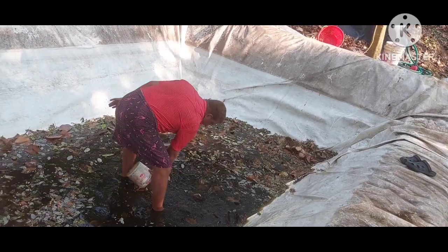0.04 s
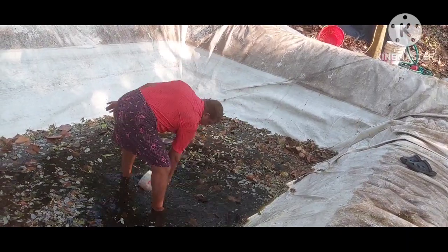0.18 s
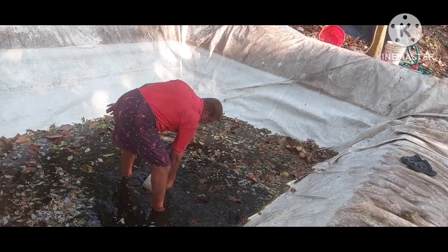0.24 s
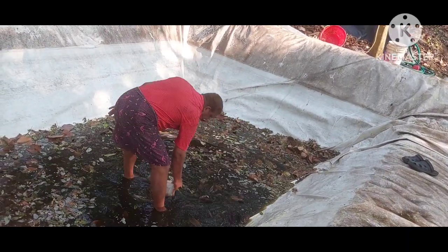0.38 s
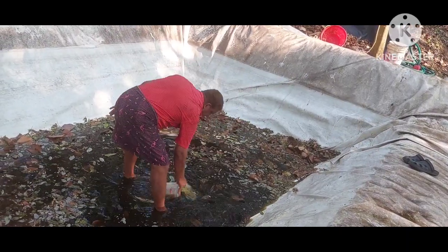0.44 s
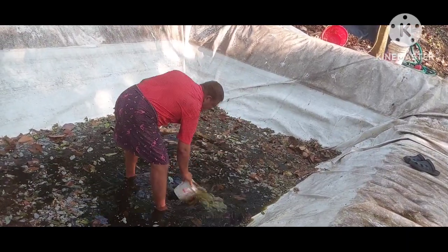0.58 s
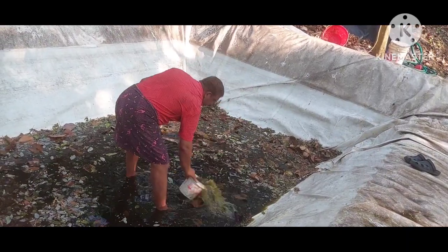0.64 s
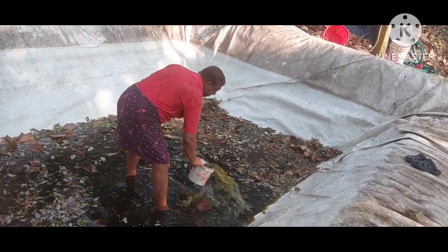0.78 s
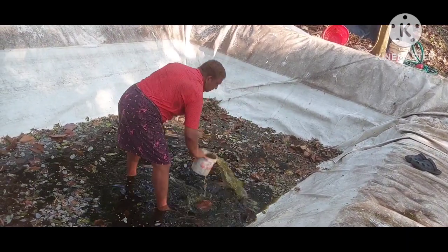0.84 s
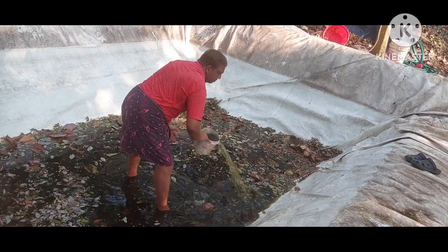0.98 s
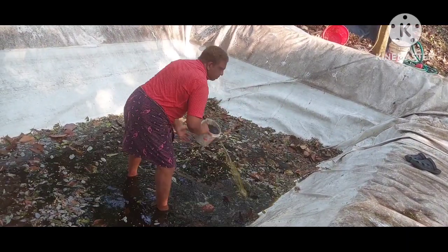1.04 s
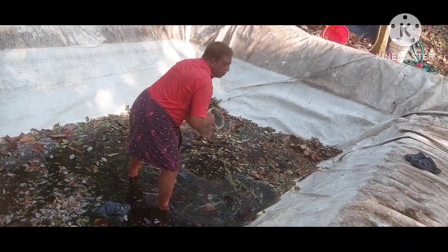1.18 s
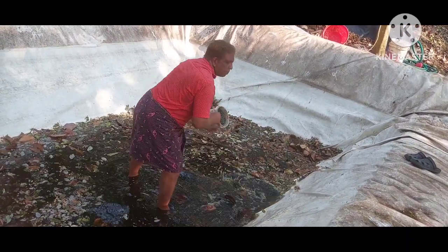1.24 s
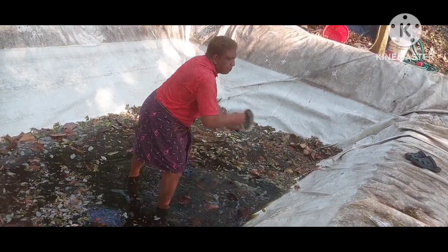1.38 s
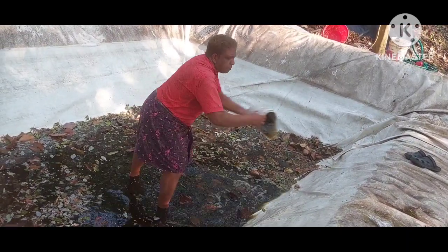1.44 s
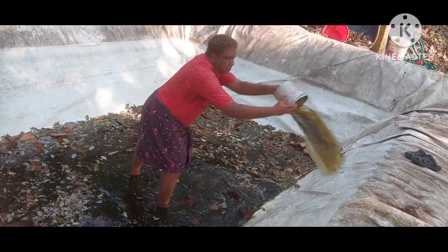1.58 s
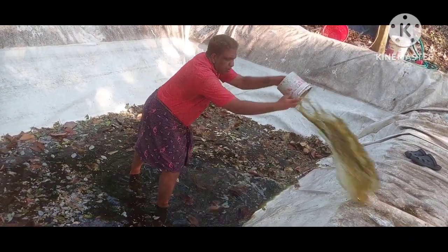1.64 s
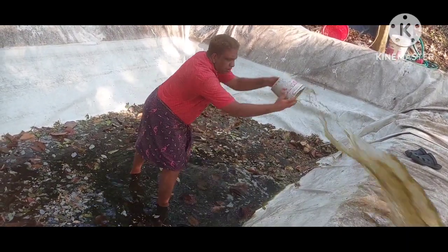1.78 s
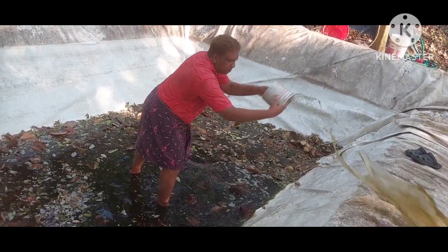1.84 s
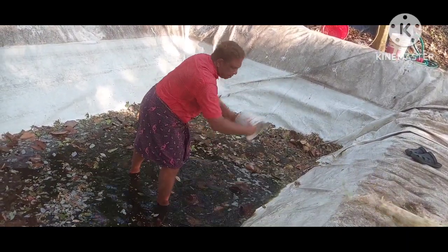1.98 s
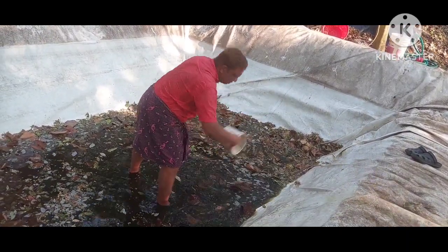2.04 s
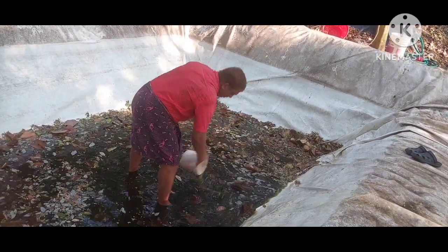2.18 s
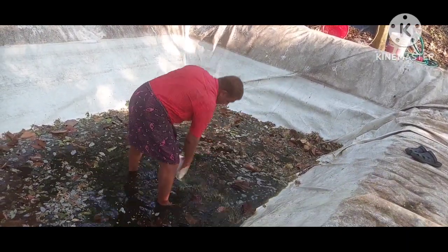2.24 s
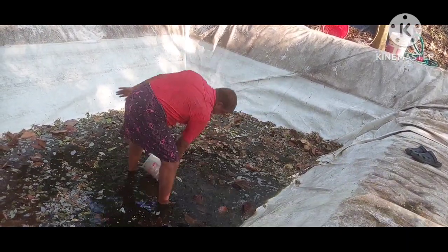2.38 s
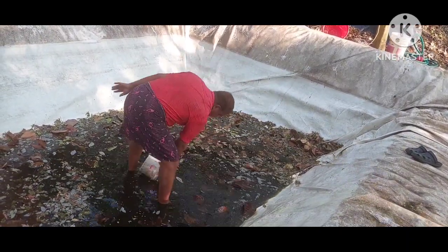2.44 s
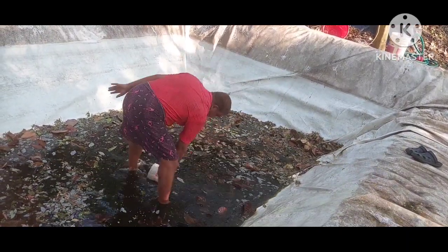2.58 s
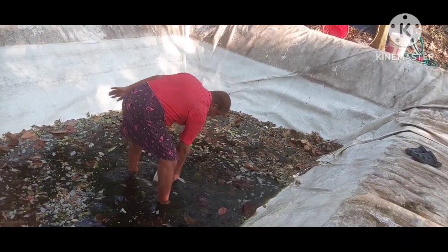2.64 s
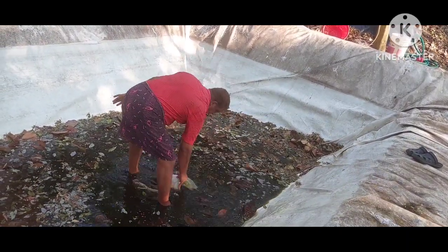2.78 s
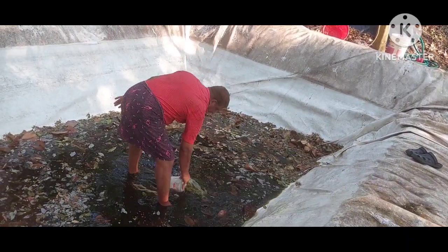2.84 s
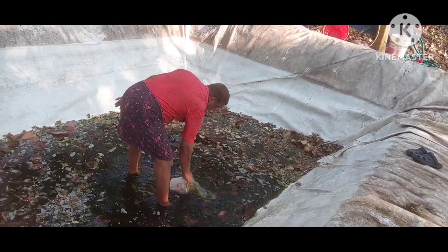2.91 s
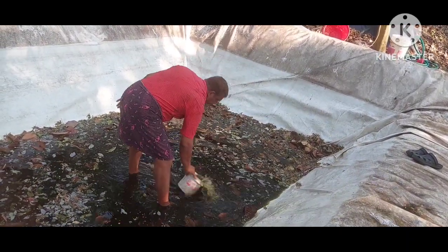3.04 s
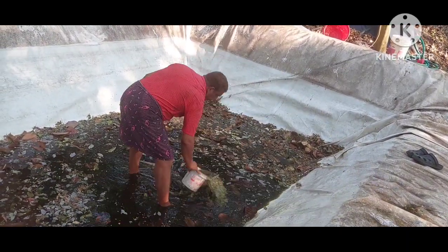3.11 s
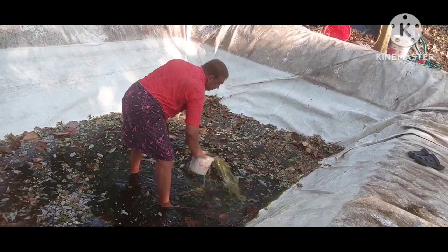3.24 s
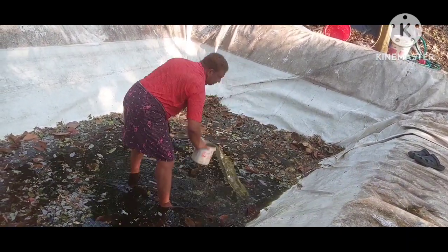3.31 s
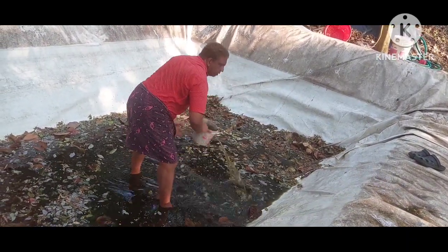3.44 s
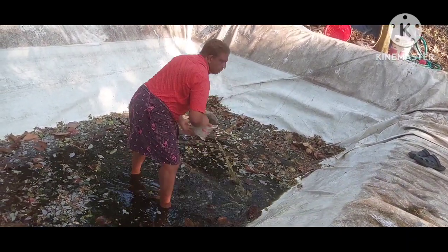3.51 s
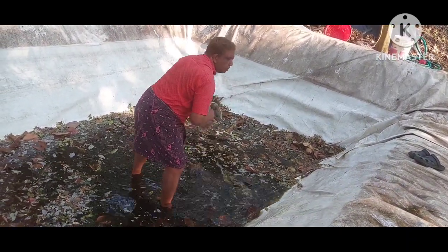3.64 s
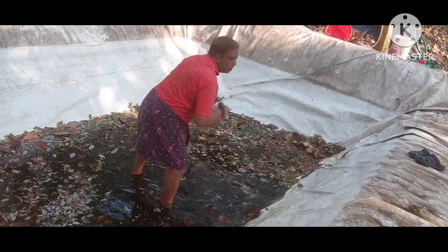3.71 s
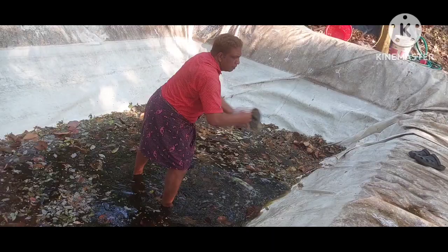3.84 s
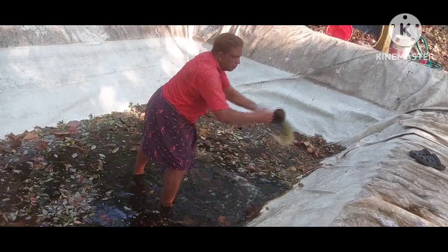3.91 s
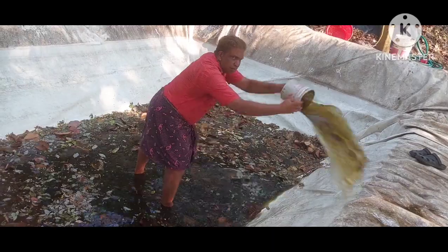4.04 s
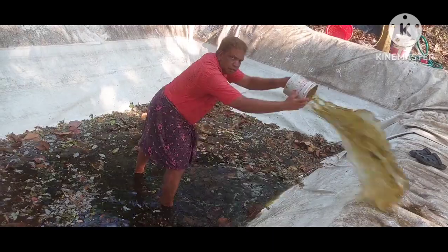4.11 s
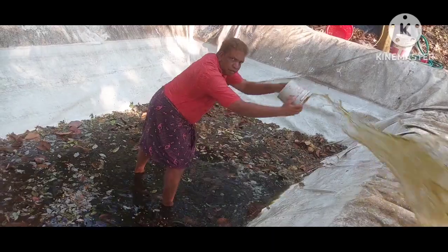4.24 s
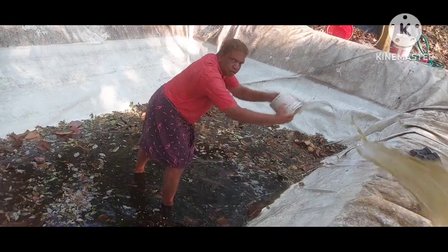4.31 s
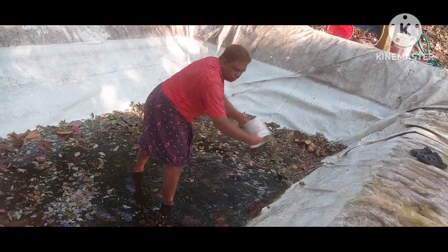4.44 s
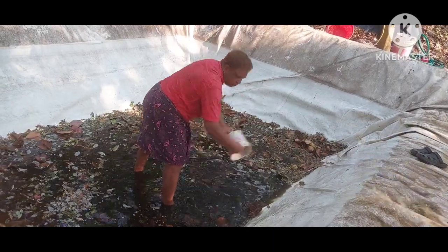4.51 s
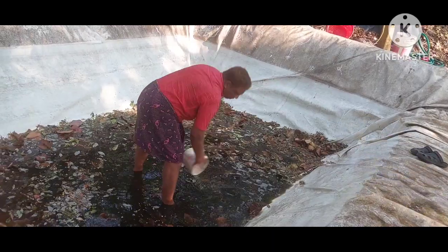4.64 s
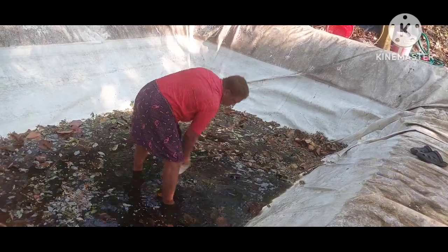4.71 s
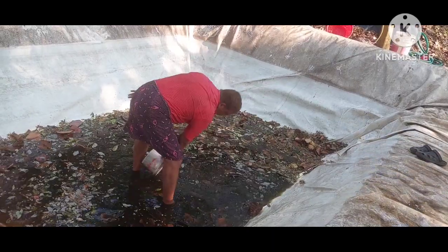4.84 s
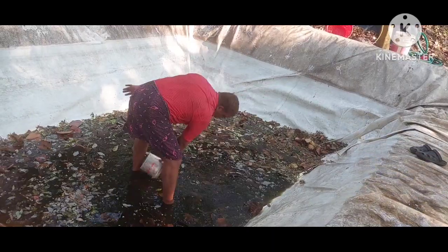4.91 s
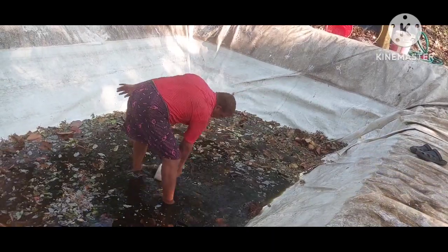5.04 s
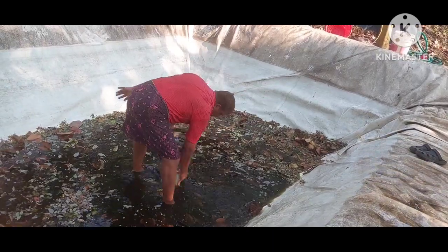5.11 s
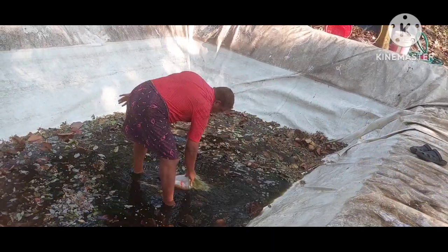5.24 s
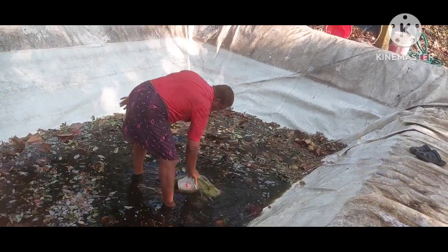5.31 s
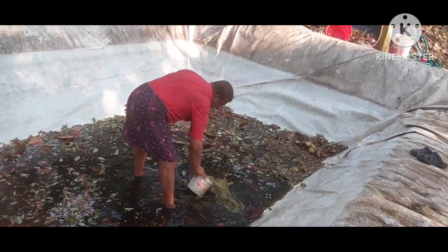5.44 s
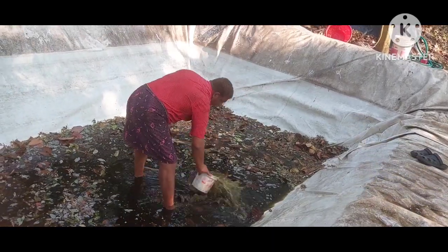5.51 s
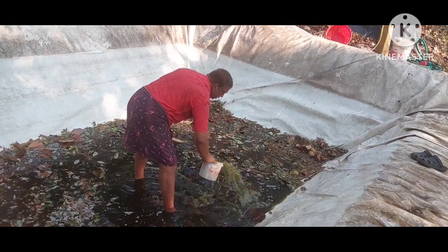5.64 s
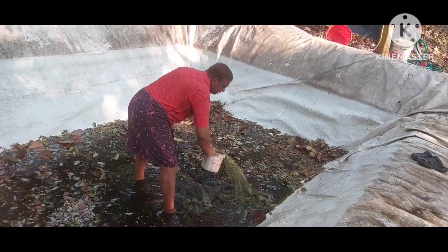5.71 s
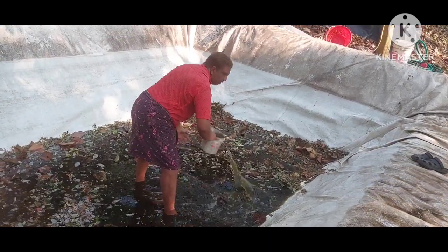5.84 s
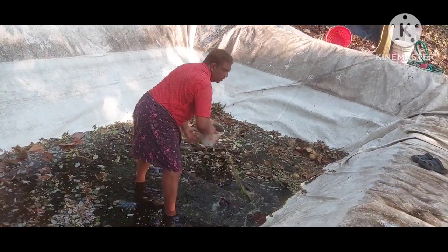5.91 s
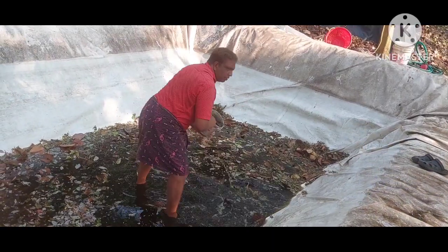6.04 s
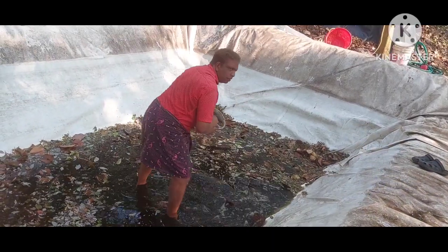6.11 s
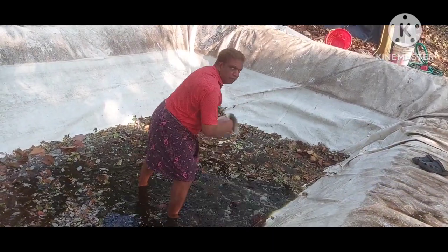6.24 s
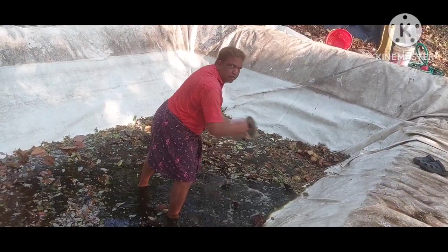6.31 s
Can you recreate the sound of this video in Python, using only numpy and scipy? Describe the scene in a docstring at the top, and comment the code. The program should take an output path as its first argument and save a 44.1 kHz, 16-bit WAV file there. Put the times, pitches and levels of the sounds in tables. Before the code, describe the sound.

Quiet sloshing and gurgling as a bucket drags through a shallow lined pond, water streaming off it. Two flung loads burst as the loudest events, a sharp wet slap first, then heavy splatter on the liner, each followed by stray drops. A faint, hoarse far animal call precedes the first throw. A third scoop ends without a throw. Near microphone, open air, very short reflections.

```python
"""A small bucket scoops muddy water three times from a shallow, plastic-lined pond with a wader in it.
Scoops and spills are bubble swarms and noise under gain curves; gulps are gliding notes of trapped air.
Two bucketfuls, flung to the right, drum and spatter on the liner as low bubbles plus bright spray.
Mud plashes as bubble clusters, drops tick as noise cracks, the bucket's air space rings as it fills.
Drips follow each spill; a faint two-harmonic call sounds far off over quiet coloured noise."""
import sys
import numpy as np
from scipy import signal
from scipy.fft import rfft, irfft, next_fast_len
from scipy.io import wavfile
from scipy.ndimage import uniform_filter1d, map_coordinates

SR = 44100
rng = np.random.default_rng(int(sys.argv[2]) if len(sys.argv) > 2 else 0)


def persist_wave(psi):
    """Save psi, clipped to +-1, as 16-bit WAV."""
    counts = np.round(np.clip(psi, -1, 1) * 32767).astype(np.int16)
    wavfile.write(sys.argv[1], SR, np.atleast_2d(counts).T)


N = 281443


def amp(db):
    """Decibels to gain."""
    return 10 ** (np.asarray(db) / 20)


def unit(x):
    """x at rms 1."""
    return x / np.sqrt(np.mean(x ** 2) + 1e-20)


def along(points, hz):
    """(f/Hz, value) points interpolated on a log frequency axis."""
    f, v = np.transpose(points)
    return np.interp(np.log(hz + 1), np.log(f + 1), v)


def filtered(x, response):
    """x times a response of frequency."""
    size = x.shape[-1]
    m = next_fast_len(size + 8192)
    return irfft(rfft(x, m) * response(np.fft.rfftfreq(m, 1 / SR)), m)[..., :size]


def coloured(x, spectrum):
    """x filtered by a (f/Hz, level/dB) curve, at rms 1."""
    return unit(filtered(x, lambda hz: amp(along(spectrum, hz))))


def placed(x, balance):
    """Tilt a stereo sound between left and right, frequency by frequency."""
    return filtered(x, lambda hz: amp(np.outer([.5, -.5], along(balance, hz))))


def add(track, s, sound):
    """Mix a short sound into a track at time s."""
    part = track[..., round(s * SR):][..., :sound.shape[-1]]
    part += sound[..., :part.shape[-1]]


def envelope(s, length, attack, release_db_per_s, sag_db_per_s=0):
    """Gain that rises at s, holds for its length while sagging, then dies away."""
    t = np.arange(N) / SR - s
    sag_db = sag_db_per_s * np.clip(t, 0, length)
    release_db = release_db_per_s * np.maximum(t - length, 0)
    return np.clip(t / attack, 0, 1) * amp(-sag_db - release_db)


def together(flows):
    """Unrelated flows add in power, layer by layer."""
    return np.sqrt(np.sum(np.square(flows), axis=0))


def surges(rate, depth_db):
    """Water arrives in uneven gushes: a smooth random gain, rate knots a second."""
    knots = rng.standard_normal(2000)
    curve = map_coordinates(knots, [np.arange(N) * rate / SR], mode="wrap")
    return amp(depth_db * np.clip(curve, -1.5, 1.5))


def bubbles(low_hz, high_hz, cycles, spread_db, lag_ms, scatter_ms, wash_db, count, rise=0.16):
    """Stereo swarm of bubbles that rise in pitch and die, over the noise wash of countless smaller ones."""
    when, pitch, life = rng.random((count, 3)).T
    loud, pan, place = np.clip(rng.standard_normal((count, 3)).T, -2, 2)
    hz = low_hz * (high_hz / low_hz) ** pitch
    length = (cycles * (.5 + life) * SR / hz).astype(int) + 2
    # all bubbles end to end: row = bubble index, age in samples
    row = np.repeat(np.arange(count), length)
    age = np.arange(len(row)) - (np.cumsum(length) - length)[row]
    u = age / length[row]
    shape = np.exp(-4 * u) * (1 - u) * (1 - np.exp(-20 * u))
    tone = np.sin(2 * np.pi * hz[row] * age / SR * (1 + rise * u / 2))
    ring = (hz * amp(spread_db * loud))[row] * shape * tone
    # each bubble has its own spot, so its own delay and balance between the sides
    pair = np.zeros((2, N))
    for channel, side in enumerate((.5, -.5)):
        delay = side * (lag_ms + scatter_ms * place) * SR / 1000
        start = np.abs(when * N + delay).astype(int)
        pair[channel] = np.bincount(start[row] + age, ring * amp(side * 2 * pan)[row], N)[:N]
    # the flow feeding the swarm is even over a tenth of a second
    power = np.abs(uniform_filter1d(np.mean(pair ** 2, axis=0), size=SR // 10))
    swarm = pair / np.sqrt(power + power.mean() / 20)
    # the wash comes from the same direction, and grows diffuse in the treble
    direct = filtered(rng.standard_normal(N),
                      lambda f: np.exp(np.outer([-1j, 1j], np.pi * f * lag_ms / 1000)))
    diffuse = filtered(rng.standard_normal((2, N)), lambda f: f / (f + 3000))
    wash = filtered(direct + diffuse, lambda f: 1 / (1 + (f / high_hz) ** 4))
    return swarm + amp(wash_db) * unit(wash)


def pocket(hz, t60, swell_s, rise):
    """One air pocket: a note that swells, glides up and dies, with its envelope of peak 1."""
    t = np.arange(SR // 4) / SR
    shape = (1 - np.exp(-(t / swell_s) ** 2)) * amp(-60 * t / t60)
    shape = shape / shape.max()
    # pitch gains the share rise per half t60, up to twice that
    glide_hz = hz * (1 + rise * np.minimum(2 * t / t60, 2))
    return shape * np.sin(2 * np.pi * np.cumsum(glide_hz) / SR), shape


# bucket or leg pushing through the pond: t/s, length/s, level/dB, big-bubble weight/dB, churn weight/dB
STROKES = [(-.01, 0.038, -44.5, -8, -20), (0.063, 0.091, -48, 0.5, -3.5), (0.168, 0.064, -49.5, -4, -15),
           (0.259, 0.13, -50, -5, -2), (0.407, 0.2, -45.5, -2.5, 1), (1.04, 0.11, -43.5, -11, -5.5),
           (2.475, 0.13, -52.5, 2, -16), (2.623, 0.049, -46.5, -25, -28), (2.708, 0.19, -49.5, -7.5, -9.5),
           (2.864, 0.19, -47.5, -3.5, -0.5), (3.076, 0.09, -50.5, -16, -26), (3.167, 0.085, -48, -16, -17),
           (3.267, .085, -57, -18, 5), (3.384, 0.11, -56, 1.5, 2.5), (4.915, 0.031, -47.5, 0, -8.5),
           (4.977, 0.015, -42, -4, -10), (5.064, 0.25, -45, -9, -9), (5.313, 0.11, -43, -1.5, -3.5),
           (5.437, 0.15, -49.5, -0.5, -16)]
STROKE_ATTACK_S, STROKE_SETTLE_DB_PER_S = 0.012, 186
STROKE_SLOSH_DB, STROKE_GURGLE_DB, STROKE_PATTER_DB = -4.5, -0.5, 0
# overflow of the lifted bucket: start t/s, full t/s, thinning t/s, stop t/s, level/dB,
# gurgle loss/(dB/s), relative level of later drips/dB
SPILLS = [(0.54, 0.877, 1.04, 1.2, -43, 58, -54), (3.258, 3.29, 3.46, 3.62, -42, 66, -56),
          (5.512, 5.724, 5.864, 6.075, -41, 85, -61)]
SPILL_ATTACK_S, SPILL_STOP_DB_PER_S = 0.044, 196
LIFT_DB = 4.5  # the fall gets louder as the bucket rises
SPILL_SLOSH_DB, SPILL_CHURN_DB, SPILL_GURGLE_DB, SPILL_PATTER_DB = -22.5, -8.5, 0.5, 0
PATTER_THINS_DB_PER_S = 35.5  # a thin stream breaks into drops


def stirring():
    """Gains of slosh, churn, gurgle, patter: strokes push air under, then overflow swells and thins."""
    t, flows = np.arange(N) / SR, []
    for s, length, db, weight_db, churn_db in STROKES:
        push = amp(db) * envelope(s, length, STROKE_ATTACK_S, STROKE_SETTLE_DB_PER_S)
        layers_db = [STROKE_SLOSH_DB + weight_db, churn_db, STROKE_GURGLE_DB, STROKE_PATTER_DB]
        flows.append(np.outer(amp(layers_db), push))
    for s, full, thins, stops, db, loss, _ in SPILLS:
        lift_db = LIFT_DB * np.clip((full - t) / (full - s), 0, 1)
        stream = amp(db - lift_db) * envelope(s, stops - s, SPILL_ATTACK_S, SPILL_STOP_DB_PER_S)
        thinning = np.maximum(np.minimum(t, stops) - thins, 0)
        trapped = stream * amp(-loss * thinning)
        patter = stream * amp(SPILL_PATTER_DB - PATTER_THINS_DB_PER_S * thinning)
        flows.append([amp(SPILL_SLOSH_DB) * trapped, amp(SPILL_CHURN_DB) * trapped,
                      amp(SPILL_GURGLE_DB) * trapped, patter])
    return together(flows)


# colour of falling drops: f/Hz, level/dB
PATTER = [(200, -43.5), (550, -27.5), (1350, -7.5), (2300, -5), (3220, -5), (4790, -3.5), (9830, -15),
          (12100, -13), (15500, -14.5)]


def grit():
    """The fastest droplets hit the surface with single bright clicks: sparse impulses on noise bursts."""
    clicks = rng.standard_normal(N) * (rng.random(N) < 45 / SR)
    life = np.exp(-np.arange(SR // 100) / SR / 0.00031)
    burst = life * rng.standard_normal((2, len(life)))
    return coloured(signal.fftconvolve(clicks[None], burst, axes=1)[:, :N], PATTER)


# colours of big, medium and middle bubbles: f/Hz, level/dB
SLOSH = [(71, -19), (120, -9.5), (232, -6), (312, 2.5), (560, 0.5), (730, -46), (1230, -120)]
CHURN = [(330, -44), (560, -4), (750, 4), (980, -1), (1300, 0.5), (2200, -15)]
GURGLE = [(320, -82), (550, -14), (912, -3), (1670, -3.5), (2210, -1.5), (2700, -6.5), (3510, -7),
          (5940, -120)]
# left minus right for pond sounds: f/Hz, level/dB
POND_SIDE = [(100, -12.5), (380, -3.5), (1300, -0.5), (2400, 2), (4400, 3.5), (8000, 2), (15000, -5.5)]
GRIT_DB = -12  # relative to the patter


def scooping():
    """The bucket drags big bubbles under; the overflow gurgles and patters back into the pond."""
    slosh, churn, gurgle, patter = stirring()
    big = bubbles(175.0, 648, cycles=27.6, spread_db=5.0, lag_ms=0, scatter_ms=0.091,
                  wash_db=2.0, count=1300)
    plops = bubbles(480, 1300, cycles=15, spread_db=3.5, lag_ms=-.04, scatter_ms=.04,
                    wash_db=-11, count=2600, rise=.25)
    middle = bubbles(600, 2900, cycles=22, spread_db=4.4, lag_ms=0, scatter_ms=.07,
                     wash_db=-14, count=5500, rise=.22)
    small = bubbles(2100, 7500, cycles=26, spread_db=4.2, lag_ms=.02, scatter_ms=.04,
                    wash_db=-4, count=13000)
    # the finest droplets merge into a smooth fizz
    fizz = filtered(rng.standard_normal((2, N)), lambda hz: 1 - 1 / (1 + (hz / 7000) ** 6))
    dip = slosh * coloured(big, SLOSH) + churn * coloured(plops, CHURN)
    burble = gurgle * coloured(middle, GURGLE)
    droplets = coloured(unit(small) + amp(2.5) * unit(fizz), PATTER) + amp(GRIT_DB) * grit()
    spill = amp(-2.0) * burble + amp(-1.02) * patter * droplets
    return placed(dip + spill * surges(rate=30, depth_db=2.0), POND_SIDE)


# colour of the outdoor air: f/Hz, level/dB
AIR = [(21, -22.5), (35, -9.5), (135, -16), (174, -26), (262, -20.5), (370, -17), (520, -24.5), (1200, -31),
       (3500, -26), (8410, -34), (12000, -30.5), (15500, -33)]


def air(level_db=-61):
    """Quiet outdoor air: noise shared by both sides plus separate noise that grows with frequency."""
    common, apart = rng.standard_normal(N), rng.standard_normal((2, N))
    diffuse = filtered(apart, lambda hz: 0.84 + hz / (hz + 1500))
    return amp(level_db) * coloured(common + diffuse, AIR)


# clots of mud and water falling back: t/s, level/dB, centre f/Hz
PLASHES = [(0.019, -46.5, 1460), (.076, -41, 920), (.721, -41.5, 1200), (.842, -43, 1230),
           (0.862, -39.5, 1293), (1.055, -45, 1950), (1.178, -35.5, 1147), (2.501, -44, 1510),
           (3.290, -41, 1426), (3.329, -40, 1230), (3.349, -41, 1295), (3.412, -41.5, 913),
           (3.977, -41, 723), (4.528, -35.5, 1720), (5.686, -43.5, 1100), (5.709, -40, 2180),
           (5.760, -42, 2105), (5.813, -39, 1130)]
# bubble spread in time and pitch (+-); cycles to fall to 1/e
PLASH_LENGTH_S, PLASH_OCTAVES, PLASH_CYCLES = .016, 0.607, 6.9


def plashes(froth_db=-9, count=16):
    """A clot of mud drops in and traps a tight cluster of bubbles, the first ones loudest."""
    track, t = np.zeros(N), np.arange(SR // 16) / SR
    for s, db, centre_hz in PLASHES:
        draws = rng.uniform([0, -PLASH_OCTAVES], [1, PLASH_OCTAVES], (count, 2))
        late, octaves = draws.T[..., None]
        late = PLASH_LENGTH_S * late ** 1.7  # crowds the bubbles early
        cycles = np.maximum(t - late, 0) * centre_hz * 2 ** octaves
        decay = np.exp(-late / PLASH_LENGTH_S - cycles / PLASH_CYCLES)
        rings = (1 - np.exp(-cycles)) * decay * np.sin(2 * np.pi * cycles)
        colour = [(centre_hz / 2, -30), (centre_hz, 0), (10 * centre_hz, -26)]
        froth = np.exp(-2 * t / PLASH_LENGTH_S) * coloured(rng.standard_normal(len(t)), colour)
        sound = unit(rings.sum(axis=0)) + amp(froth_db) * unit(froth)
        high_pass = signal.butter(2, centre_hz / 2, "high", fs=SR, output="sos")
        no_bass = signal.sosfilt(high_pass, sound)
        add(track, s, amp(db) * no_bass * np.sqrt(PLASH_LENGTH_S / t[-1]))
    return placed(np.array([track, track]), POND_SIDE)


# single drops and knocks on the bucket: t/s, relative level/dB, lower edge of brightest band f/Hz, t60/s
TICKS = [(.1, -38, 1670, 0.044), (0.224, -28, 5270, 0.014), (0.411, -41.5, 1620, 0.053),
         (1.19, -34, 5030, 0.021), (1.362, -31, 3620, 0.013), (1.586, -31, 5400, 0.015),
         (1.624, -31, 1970, 0.018), (1.646, -33, 2440, 0.049), (1.801, -27, 3800, 0.021),
         (2.235, -20, 4100, 0.02), (2.334, -30, 3750, 0.016), (2.548, -30, 5100, 0.038),
         (2.631, -38.5, 3530, 0.028), (3.556, -33, 3460, 0.032), (3.608, -37, 4260, 0.041),
         (3.739, -46, 3700, 0.024), (3.788, -39, 4730, 0.013), (3.938, -45.5, 4400, 0.022),
         (4.257, -43, 4120, 0.53), (4.985, -40, 2200, 0.09), (5.047, -34.5, 4000, 0.019),
         (5.995, -30, 2620, 0.012), (6.035, -35, 2240, 0.028), (6.065, -37.5, 2370, 0.017)]


def ticks(diffuse=1.0, skirt_db=-15):
    """A drop or a knock is a broad noise crack that dies fast."""
    track, t = np.zeros((2, N)), np.arange(SR // 10) / SR
    for s, db, hz, t60 in TICKS:
        noise = rng.standard_normal(len(t)) + diffuse * rng.standard_normal((2, len(t)))
        colour = [(hz / 10, -30), (hz * 1.0, 0), (hz * 1.32, 0), (hz * 2, skirt_db), (hz * 10, -26)]
        crack = coloured(noise, colour)
        add(track, s, amp(db + 6.0) * crack * amp(-60 * t / t60) * (1 - np.exp(-t / 0.0017)))
    return track


# air pockets closing in water and bucket: t/s, note level/dB, starting f/Hz, t60/s
GULPS = [(.106, -35, 306, 0.12), (0.224, -36.5, 413, 0.063), (.591, -30.5, 756, 0.04),
         (1.548, -34.5, 186, .085), (1.729, -31.5, 755, 0.048), (1.966, -18, 328, 0.03),
         (2.009, -23.5, 236, 0.056), (2.463, -34.5, 310, 0.074), (2.889, -34.5, 630, 0.049),
         (2.896, -26, 970, 0.042), (3.002, -34.5, 938, .04), (4.001, -41.5, 297, 0.12),
         (4.425, -20.5, 298, 0.019), (4.447, -18, 286, 0.042), (4.464, -23.5, 312, .05),
         (4.986, -39, 356, 0.17), (5.872, -27, 862, 0.04)]
GULP_SWELL_S = 0.0017
GULP_RISE = .12  # pitch share gained per half t60, as the pocket nears the surface


def gulps(froth_db=-14, shards_db=-8, count=4):
    """Trapped air sounds a gliding note and sheds smaller bubbles; small pockets break up more."""
    track = np.zeros(N)
    for s, db, hz, t60 in GULPS:
        note, shape = pocket(hz, t60, GULP_SWELL_S, GULP_RISE)
        colour = [(hz / 2, -40), (2 * hz, 0), (20 * hz, -30)]
        froth = shape * coloured(rng.standard_normal(len(note)), colour)
        rough = hz ** 2 / (hz ** 2 + 700 ** 2)
        add(track, s, amp(db) * (note + amp(froth_db) * rough * froth))
        for late, octaves in rng.uniform([0, -.5], [.3, .9], (count, 2)):
            shard, _ = pocket(hz * 2 ** octaves, t60 / 2, GULP_SWELL_S / 2, GULP_RISE)
            add(track, s + late * t60, amp(db + shards_db) * rough * shard)
    return placed(np.array([track, track]), POND_SIDE)


DRIPS_DRY_DB_PER_S = 13


def dripping():
    """After each spill, drops keep falling from the bucket, the arms and the wet liner."""
    drops = bubbles(900, 6500, cycles=18, spread_db=3, lag_ms=0, scatter_ms=.1, wash_db=-6, count=2200)
    seep = amp(-5.5) * rng.standard_normal((2, N))
    wet = together([amp(db) * envelope(stops, 0, SPILL_ATTACK_S, DRIPS_DRY_DB_PER_S)
                    for _, _, _, stops, _, _, db in SPILLS])
    uneven = surges(rate=28, depth_db=3.5)
    return wet * uneven * coloured(unit(drops) + seep, PATTER) * amp(-5.0)


# pitch and level track of the far call: t/s, f/Hz, level/dB
CALL = [(1.31, 860, -72), (1.36, 840, -64), (1.43, 815, -61), (1.47, 790, -60.5), (1.55, 765, -63)]


def far_call(fundamental_db=-9, hoarse=1.1):
    """A thin, hoarse call, perhaps of a distant fowl; its noise-blurred second harmonic leads."""
    t = np.arange(N) / SR
    s, hz, db = np.transpose(CALL)
    phase = 2 * np.pi * np.cumsum(np.interp(t, s, hz)) / SR
    blur = unit(filtered(rng.standard_normal((2, N)), lambda f: 1 / (1 + (f / 140) ** 4)))
    second = np.sin(2 * phase) * (1 + hoarse * blur[0]) + np.cos(2 * phase) * hoarse * blur[1]
    level = amp(np.interp(t, s, db, left=-np.inf, right=-np.inf))
    return level * (amp(fundamental_db) * np.sin(phase) + unit(second))


# bulk of each bucketful landing on the liner: t/s, length/s, level/dB, run-off/(dB/s)
SHEETS = [(1.843, 0.32, -27.5, 66), (4.27, 0.27, -26.5, 111.5)]
SHEET_ATTACK_S, SHEET_SAG_DB_PER_S = 0.066, 12
SHEET_SPLAT_DB, SPLAT_SAG_DB_PER_S = -7, 22
DRUM_DB, DRUM_DELAY_S, DRUM_WIDTH_S = -6, 0.25, 0.14  # heavy core lands after the sheet's front
# smaller dollops ahead of or behind the sheet: t/s, swell/s, length/s, level/dB
DOLLOPS = [(1.531, 0.019, 0.049, -46.5), (1.614, .025, 0.095, -40.5), (1.767, 0.051, 0.063, -35.5),
           (3.96, 0.037, 0.069, -43), (4.067, 0.033, 0.029, -43), (4.631, 0.037, 0.13, -40.5)]
DOLLOP_RUNOFF_DB_PER_S, DOLLOP_DRUM_DB, DOLLOP_SPLAT_DB = 110.5, -9.5, -7.5


def landing():
    """Gains of drumming, splat and spray: a sheet with a heavy core, and dollops around it."""
    t, flows = np.arange(N) / SR, []
    for s, length, db, runoff in SHEETS:
        spray = amp(db) * envelope(s, length, SHEET_ATTACK_S, runoff, SHEET_SAG_DB_PER_S)
        splat_env = envelope(s, length, SHEET_ATTACK_S, runoff, SPLAT_SAG_DB_PER_S)
        splat = amp(db + SHEET_SPLAT_DB) * splat_env
        core = amp(DRUM_DB) / np.hypot(1, (t - s - DRUM_DELAY_S) / DRUM_WIDTH_S)
        flows.append([core * spray, splat, spray])
    for s, swell, length, db in DOLLOPS:
        dollop = amp(db) * envelope(s, length, swell, DOLLOP_RUNOFF_DB_PER_S)
        flows.append([amp(DOLLOP_DRUM_DB) * dollop, amp(DOLLOP_SPLAT_DB) * dollop, dollop])
    return together(flows)


# colours of lumps, blobs and fine drops on the liner: f/Hz, level/dB
DRUM = [(26, -39), (62, -18.5), (139, -5), (179, -6.5), (270, 2), (520, -1.5), (680, -26), (1140, -120)]
SPLAT = [(280, -42.5), (480, -17.5), (668, -1.5), (1830, 0.5), (2200, 4), (2860, -24), (4840, -120)]
SPRAY = [(200, -24.5), (1120, -12.5), (1900, -11), (2210, -5.5), (2920, -5), (5650, -6), (7280, -10.5),
         (8840, -22), (11700, -10), (15500, -13)]
# left minus right for liner sounds: f/Hz, level/dB
LINER_SIDE = [(60, -11.5), (130, -6), (350, -1), (700, -5), (1300, 0), (2400, 0.5), (4400, 11), (8000, -9),
              (15000, -6.5)]


def throwing():
    """A sheet of water lands to the right: lumps drum on the liner, and it bursts into fine spray."""
    drum, splat, spray = landing()
    lumps = bubbles(43.3, 624, cycles=5.8, spread_db=1.5, lag_ms=0.16, scatter_ms=0.11,
                    wash_db=-32.0, count=4500)
    blobs = bubbles(465, 2580, cycles=9.1, spread_db=4.0, lag_ms=0.24, scatter_ms=0.056,
                    wash_db=-9, count=10000)
    drops = bubbles(1800, 16000, cycles=5, spread_db=3, lag_ms=.33, scatter_ms=.05,
                    wash_db=-2, count=40000)
    burst = amp(4.5) * splat * coloured(blobs, SPLAT) + amp(3.5) * spray * coloured(drops, SPRAY)
    return placed(drum * coloured(lumps, DRUM) + burst * surges(rate=92, depth_db=1.27), LINER_SIDE)


# lumps of water shifting in the bucket or slapping the liner:
# t/s, note level/dB, starting f/Hz, t60/s, left-side lag/ms
SLAPS = [(1.537, -29, 760, .07, -.07), (1.822, -23, 900, .03, .14), (1.8315, -12.5, 800, .0135, .14)]
SLAP_SWELL_S, SLAP_RISE = .0026, .1


def slaps(mud_db=-7.5):
    """A lump of water squeezes out a few cycles of trapped air inside a thick, muddy splash."""
    track = np.zeros((2, N))
    mud_colour = [(120, -28.5), (300, -11.0), (650, -1.5), (1150, -1), (1550, -5.5), (2000, -13.0),
                  (9000, -38)]
    for s, db, hz, t60, lag_ms in SLAPS:
        note, shape = pocket(hz, t60, SLAP_SWELL_S, SLAP_RISE)
        mud = coloured(rng.standard_normal(len(note)), mud_colour)
        sides = lambda f: np.exp(np.outer([-1j, 1j], np.pi * f * lag_ms / 1000))
        add(track, s, amp(db) * filtered(note + amp(mud_db) * shape * mud, sides))
    return placed(track, POND_SIDE)


# dull blows of a foot or a lump of water on the liner: t/s, level/dB, upper edge f/Hz, t60/s
THUDS = [(1.545, -41.5, 280, 0.17), (1.823, -20.5, 336, 0.032), (1.833, -20.5, 420, 0.027),
         (2.096, -29, 146, 0.069), (2.811, -43, 184, 0.093), (4.444, -30.5, 202, 0.18),
         (5.16, -40, 129, 0.24)]


def thuds(attack_s=0.001):
    """The liner lies on soft ground, so a blow is a dull noise push with no ring."""
    track, t = np.zeros(N), np.arange(SR // 4) / SR
    for s, db, hz, t60 in THUDS:
        colour = [(hz / 8, -24), (hz / 1.5, 0), (hz, 0), (2 * hz, -26), (10 * hz, -80)]
        push = coloured(rng.standard_normal(len(t)), colour)
        add(track, s, amp(db - 60 * t / t60) * (1 - np.exp(-t / attack_s)) * push)
    return placed(np.array([track, track]), LINER_SIDE)


# water running into the bucket rings its air space: t/s, length/s, level/dB, first f/Hz, f/Hz at length
HOLLOWS = [(1.575, .045, -50.5, 1030, 955), (2.602, .115, -55, 616, 1920), (4.949, 0.25, -52, 1895, 2290),
           (5.919, 0.15, -52.5, 1464, 1444)]
HOLLOW_DROPS_PER_S, HOLLOW_CYCLES, HOLLOW_STOP_DB_PER_S = 260, 5.5, 420


def filling():
    """Drops excite the hollow note of the bucket, which glides as the air space changes."""
    t, track = np.arange(N) / SR, np.zeros(N)
    for s, length, db, first_hz, last_hz in HOLLOWS:
        hz = first_hz * (last_hz / first_hz) ** np.clip((t - s) / length, 0, 1.25)
        chance, turn = rng.random((2, N))
        drops = (chance < HOLLOW_DROPS_PER_S / SR) * np.exp(2j * np.pi * turn)
        # double-pole decay at 0 Hz, then shifted up to the gliding pitch
        keep = np.exp(-2 * last_hz / HOLLOW_CYCLES / SR)
        ring = signal.lfilter([1], np.poly([keep, keep]), drops)
        note = unit(np.real(ring * np.exp(2j * np.pi * np.cumsum(hz) / SR)))
        track += amp(db) * envelope(s, length, STROKE_ATTACK_S, HOLLOW_STOP_DB_PER_S) * note
    return track


def banks(x, t60=0.057):
    """The sloping banks of the pond answer briefly: convolution with a decaying noise tail."""
    t = np.arange(SR // 3) / SR
    tail = rng.standard_normal((2, len(t))) * amp(-60 * t / t60) * (1 - np.exp(-t / 0.01))
    return signal.fftconvolve(x, tail / np.linalg.norm(tail[0]), axes=1)[:, :N]


def scene():
    """All the water, its echo, the far call and the air."""
    water = scooping() + plashes() + ticks() + gulps() + dripping()
    water = water + throwing() + slaps() + thuds() + filling()
    return water + amp(-10.5) * banks(water) + far_call() + air()


TOP_HZ = 15750


def record(dry, low_cut_hz=40):
    """Roll off the deepest bass and pass nothing from TOP_HZ up."""
    return filtered(dry, lambda hz: (hz < TOP_HZ) * (1 - 1 / (1 + (hz / low_cut_hz) ** 6)))


dry = scene()
out = record(dry)
persist_wave(out)
```